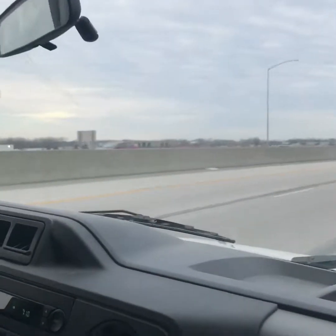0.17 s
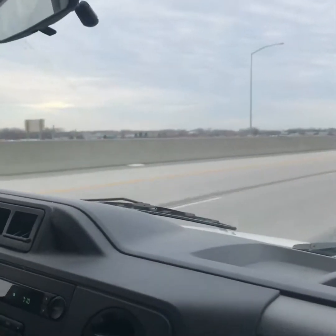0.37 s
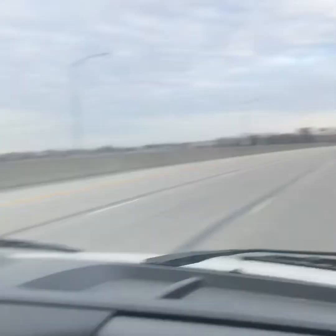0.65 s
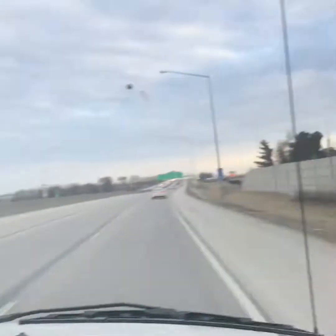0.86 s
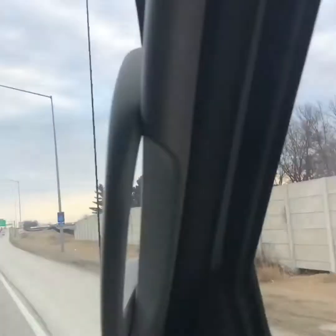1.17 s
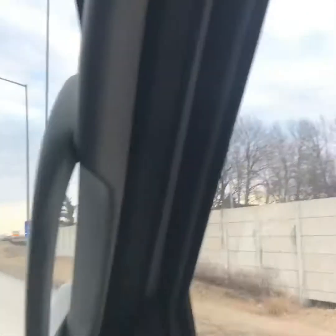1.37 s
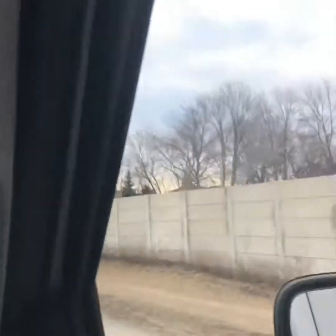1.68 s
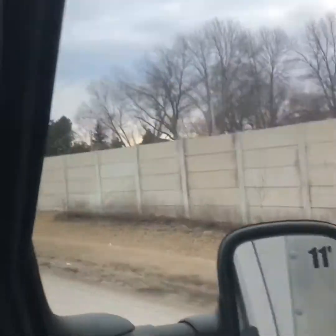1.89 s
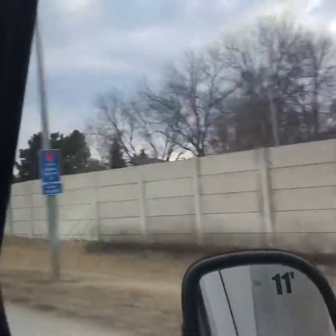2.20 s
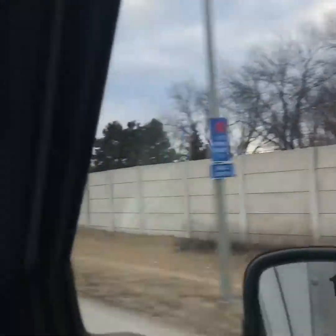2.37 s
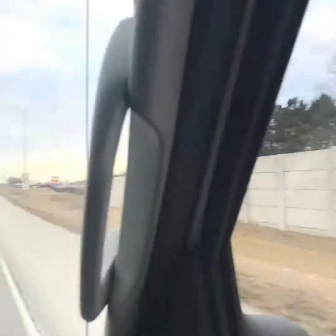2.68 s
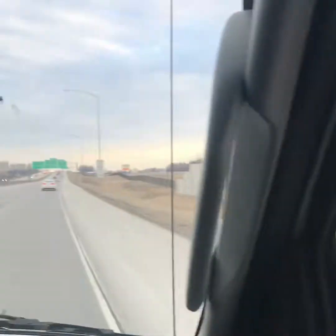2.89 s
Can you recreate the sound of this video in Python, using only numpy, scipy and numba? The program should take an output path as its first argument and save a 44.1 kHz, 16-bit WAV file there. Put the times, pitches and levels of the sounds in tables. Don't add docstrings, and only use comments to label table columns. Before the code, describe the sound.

Inside a moving van, a continuous bass-heavy boom fills the cab; the floor thuds unevenly over seams, panels resonate briefly, and faint wind whistles through a door seal, captured close by a turning phone.

```python
import sys
import numpy as np
from scipy import signal
from scipy.fft import rfft, irfft, next_fast_len
from scipy.io import wavfile
from scipy.ndimage import uniform_filter1d
from numba import njit

SR = 44100
rng = np.random.default_rng(int(sys.argv[2]) if len(sys.argv) > 2 else 0)


def to_wav(sig):
    pcm = np.clip(np.atleast_2d(sig), -1, 1) * 32767
    pcm = np.round(pcm).astype(np.int16)
    wavfile.write(sys.argv[1], SR, pcm.T)


def voltage_ratio(decibels):
    exponent = np.asarray(decibels, float) / 20
    return 10 ** exponent


N = 134505

# time_s, cycle_hz
ENGINE_CYCLE = [(0, 20.64), (.45, 20.65), (.7, 20.55), (1.3, 20.58), (1.9, 20.62), (3.05, 20.62)]
# order (multiple of the cycle), level_db (rms)
ENGINE_ORDERS = [(10, -44), (12, -54), (15, -53), (16, -56), (17, -59), (18, -54.5), (19, -58), (20, -60),
                 (25, -62), (28, -56.5), (29, -63), (30, -57.5), (31, -65), (33, -62.5)]
# pitch_hz, level_db (rms)
DRIVELINE_TONES = [
    (61.2, -27.5),
    (122.3, -38),
    (26.6, -38),
    (40.3, -38),
    (93.4, -41),
]
# time_s, load_db
DRIVELINE_LOAD = [(0, -1), (.3, 0), (.55, 1), (.8, 2.5), (1.2, 1), (1.35, -1), (1.55, 0), (1.85, 2),
                  (2.05, -2.5), (2.3, 1), (2.65, -1), (2.8, -0.5), (2.93, 0.5), (2.99, -16.5), (3.05, 8)]
# time_s, level_db (rms)
GEAR_WHINE = [(0, -48), (.3, -46), (.5, -51), (.9, -58), (3.05, -60)]
# frequency_hz, density_db (per Hz)
ROAD_SPECTRUM = [(8, -30), (18, -20), (30, -1), (60, -8), (135, -7), (230, -21.5), (460, -31), (900, -36)]
# time_s, level_db
ROAD_ROUGHNESS = [(0.03, -22.5), (0.1, -22.5), (1.15, -23.5), (1.24, -21.5), (1.29, -25.5), (1.54, -23),
                  (1.74, -24.5), (1.75, -20.5), (2.25, -22), (2.27, -21.5), (2.72, -22.5), (2.95, -23.5),
                  (2.99, -29), (3.02, -20.5)]
# time_s, peak_db, thump_hz
ROAD_SEAMS = [(0.118, -13, 44), (0.182, -14, 69), (0.281, -13.5, 45.3), (0.41, -14, 43.5), (0.672, -10, 58),
              (0.687, -19.5, 61.4), (0.756, -22, 37.4), (0.802, -12.5, 54), (0.963, -11, 32),
              (0.996, -11, 55.4), (1.099, -14.5, 45.4), (1.179, -10.5, 48.3), (1.211, -15, 37),
              (1.229, -11, 47), (1.328, -10, 49), (1.378, -15, 67), (1.457, -13, 60), (1.477, -15, 34.8),
              (1.522, -7.5, 61), (1.555, -7, 52), (1.604, -9.5, 50.3), (1.703, -12.5, 47),
              (1.849, -11, 38.3), (1.9, -10.5, 52.5), (1.997, -13, 65), (2.076, -11, 49.3),
              (2.127, -13, 65.6), (2.195, -11, 59.4), (2.26, -17, 74.5), (2.323, -13.5, 41),
              (2.422, -9, 71), (2.62, -15.5, 39), (2.928, -13, 60)]
# centre_s, length_s, pitch_hz, peak_db
PANEL_BOOMS = [(.15, 0.17, 93, -30), (.3, .3, 29, -22.5), (.62, 0.16, 100, -28), (.7, 0.38, 135, -32),
               (.76, 0.18, 43, -24), (1.0, 0.3, 36, -25), (1.05, 0.12, 120, -26.5), (1.23, 0.11, 42, -23.5),
               (1.55, 0.13, 95, -26), (1.72, .35, 42, -26), (2.2, 0.25, 93, -31.5), (2.3, 0.19, 38, -21.5),
               (2.42, 0.28, 142, -31.5), (2.42, .2, 190, -37), (2.63, 0.16, 46, -28),
               (2.8, 0.12, 98, -26.5)]
# frequency_hz, density_db (per Hz)
WIND_SPECTRUM = [(400, -23.5), (700, -12), (1300, -2), (1800, -11), (2300, -4), (3300, -27), (4600, -36.5),
                 (5000, -53.5)]
# time_s, wind_db, low_ring_hz, main_ring_hz, main_ring_db
CABIN_RINGS = [(0.03, -36, 882, 1375, 0), (0.35, -37.5, 907, 1450, 3), (0.46, -36.5, 1022, 1430, 0.5),
               (0.58, -36.5, 883, 1455, -2.5), (1.28, -37, 957, 1520, 0), (1.84, -37.5, 955, 1420, 0.5),
               (1.89, -39, 915, 1434, 4), (2.3, -38, 995, 1420, 2), (3.02, -38, 898, 1505, 1)]
# centre_s, length_s, pitch_hz, peak_db
SEAL_WHISTLES = [(.22, 0.089, 913, -47.5), (.55, .14, 1440, -46), (.65, .08, 1455, -42.5),
                 (.76, 0.062, 915, -52), (.83, .1, 1480, -50), (1.0, 0.077, 1497, -44),
                 (1.04, 0.12, 1460, -44), (1.09, 0.079, 950, -46.5), (1.15, 0.13, 998, -47.5),
                 (1.15, 0.14, 1500, -48), (1.2, .12, 1577, -43.5), (1.3, 0.13, 1500, -48),
                 (1.43, 0.064, 963, -44), (1.46, 0.087, 1465, -43), (1.52, .08, 986, -48),
                 (1.8, .1, 1493, -51.5), (1.86, 0.066, 1412, -45), (1.9, 0.064, 1440, -45),
                 (2.01, 0.077, 1423, -43), (2.1, 0.073, 1435, -50.5), (2.2, 0.091, 1416, -49.5),
                 (2.35, 0.15, 1400, -45.5), (2.5, .1, 993, -50.5), (2.75, 0.11, 1467, -45.5),
                 (2.95, 0.16, 1504, -49)]
# time_s, shaded_share (0-1)
BODY_SHADE = [(0, 0), (1.4, 0), (2.1, 0), (2.4, 0.22), (3.05, 0.09)]
# time_s, peak_db, ring_hz
TRIM_TICKS = [(.298, -57, 4200), (.338, -55, 4000), (.609, -54, 4000), (.614, -48, 3600), (.619, -53, 3800),
              (.624, -52, 4400), (.625, -57, 6500), (.634, -56, 4500), (.747, -55, 4600), (.768, -59, 5500),
              (.776, -59, 5500), (.847, -55, 4200), (1.47, -59, 6000), (1.498, -57, 4500),
              (1.512, -52, 3800), (1.521, -51, 4800), (1.53, -55, 4000), (1.568, -56, 3700),
              (1.737, -56, 3900), (1.818, -54, 3800), (1.83, -55, 3700), (2.037, -56, 3900),
              (2.118, -56, 4000), (2.207, -58, 4000)]
# frequency_hz, density_db (per Hz)
HISS_SPECTRUM = [(3500, -6), (5400, 3.5), (7600, -3), (8700, -0.5), (10400, -5.5), (11200, -3),
                 (12600, -1.5), (16000, 3.5)]


def level(x, db):
    return x * voltage_ratio(db) / np.sqrt(np.mean(x ** 2))


def column(table, axis):
    rows = np.array(table, float)
    return np.interp(np.arange(N) / SR, rows[:, 0], rows[:, axis])


def walk(rate_hz):
    hold = max(int(SR / rate_hz), 1)
    steps = np.repeat(rng.standard_normal(400), hold)[:N + 2 * hold]
    smooth = uniform_filter1d(uniform_filter1d(steps, hold), hold)
    return 1.27 * smooth[hold:N + hold]


@njit
def svf(x, hz, width_hz):
    y, band, low = np.empty(len(x)), 0., 0.
    for i in range(len(x)):
        g = np.tan(np.pi * hz[i] / SR)
        damping = width_hz / hz[i]
        v = (band + g * (x[i] - low)) / (1 + g * (g + damping))
        band, low = 2 * v - band, low + 2 * g * v
        y[i] = damping * v
    return y


def ring(x, hz, width_hz):
    centre_hz = hz + np.zeros(N)
    once = svf(x, centre_hz, 1. * width_hz)
    return svf(once, centre_hz, 1. * width_hz)


def coloured(spectrum, swell_db, flicker_db, flicker_hz):
    rows, size = np.array(spectrum, float), next_fast_len(N)
    octave = np.log2(np.arange(1, size // 2 + 2) * SR / size)
    points = np.log2(rows[:, 0])
    gain_db = np.interp(octave, points, rows[:, 1], left=-99, right=-99)
    noise = rfft(rng.standard_normal(size)) * voltage_ratio(gain_db)
    swell, out = swell_db * walk(4.284), 0
    for centre in np.arange(3, 15, .5):
        if points[0] - 1 < centre < points[-1] + 1:
            share = np.cos(np.pi * np.clip(octave - centre, -.5, .5)) ** 2
            band = irfft(noise * share, size)[:N]
            out = out + band * voltage_ratio(swell + flicker_db * walk(flicker_hz))
    return level(out, 0)


def tone(hz, db, wander_db, wander_hz):
    gain = np.sqrt(2) * voltage_ratio(db + wander_db * walk(wander_hz))
    turns = np.cumsum(hz) / SR + rng.random()
    return gain * np.sin(2 * np.pi * turns)


def bursts(times_s, db, decay_s):
    hits = np.zeros(N)
    places = np.clip((np.asarray(times_s) * SR).astype(int), 0, N - 1)
    np.add.at(hits, places, voltage_ratio(db))
    envelope = signal.lfilter([1], [1, -np.exp(-1 / (decay_s * SR))], hits)
    return envelope * rng.standard_normal(N)


def swelling_tones(table):
    t = np.arange(N) / SR
    clock = t + np.cumsum(.005 * walk(25.03)) / SR
    phase = rng.random((60, 1))
    out = np.zeros(N)
    for k, (centre_s, length_s, hz, db) in enumerate(table):
        envelope = voltage_ratio(db) * np.sqrt(2) * np.exp(-(2 * (t - centre_s) / length_s) ** 2)
        out += envelope * np.sin(2 * np.pi * (hz * clock + phase[k]))
    return out


def engine():
    cycle_hz = column(ENGINE_CYCLE, axis=1)
    return sum(tone(round(order) * cycle_hz, db, wander_db=3, wander_hz=3.5) for order, db in ENGINE_ORDERS)


def driveline():
    load_db = column(DRIVELINE_LOAD, axis=1)
    drones = sum(tone(hz + .4 * walk(3.01), db + load_db, wander_db=1.8, wander_hz=2.8)
                 for hz, db in DRIVELINE_TONES)
    whine_hz = 1401 + 2.5 * walk(1.41)
    return drones + tone(whine_hz, column(GEAR_WHINE, axis=1), wander_db=1.6, wander_hz=1.2)


def road():
    boom = coloured(ROAD_SPECTRUM, swell_db=.3, flicker_db=.7, flicker_hz=10)
    return voltage_ratio(column(ROAD_ROUGHNESS, axis=1) - 2) * boom


def seams():
    t, out = np.arange(N) / SR, np.zeros(N)
    for peak_s, db, hz in ROAD_SEAMS:
        swing = (np.pi * 1.17 * hz * (t - peak_s)) ** 2
        out += voltage_ratio(db - 2) * (1 - 2 * swing) * np.exp(-np.minimum(swing, 50))
    return out


def panel_booms():
    return swelling_tones(PANEL_BOOMS)


def rush():
    return rng.standard_normal(N) * voltage_ratio(1.1 * walk(11))


def wind():
    low_hz, main_hz = column(CABIN_RINGS, axis=2), column(CABIN_RINGS, axis=3)
    main_db = column(CABIN_RINGS, axis=4)
    low = level(ring(rush(), low_hz, width_hz=276), -7.5)
    main = level(ring(rush(), main_hz, width_hz=310), -7.5) * voltage_ratio(main_db + 0.71 * walk(20))
    leak = ring(rush(), main_hz + 20 * walk(4.2), width_hz=60)
    main += level(leak, -18) * voltage_ratio(main_db)
    high = level(ring(rush(), 2440, width_hz=574), -12)
    broad = voltage_ratio(-4) * coloured(WIND_SPECTRUM, swell_db=.4, flicker_db=1.2, flicker_hz=12)
    return voltage_ratio(column(CABIN_RINGS, axis=1)) * (broad + low + main + high)


def seal_whistles():
    return swelling_tones(SEAL_WHISTLES)


def body_shade(cab):
    hum = svf(cab, 616 + np.zeros(N), 890.)
    return cab - np.clip(column(BODY_SHADE, axis=1), 0, 1) * hum


def trim():
    decay_s, width_hz, crackle_per_s = .004, 2400, 70
    rows = np.array(TRIM_TICKS)
    chance = rng.random((400, 2))
    crackle_s = np.cumsum(-np.log(chance[:, 0]) / crackle_per_s)
    crackle_db = np.where(crackle_s < N / SR, -66 + 4 * (2 * chance[:, 1] - 1), -200)
    latest = np.clip(np.searchsorted(rows[:, 0], np.arange(N) / SR) - 1, 0, None)
    ticks = ring(bursts(rows[:, 0], rows[:, 1] + 5.5, decay_s), rows[latest, 2], width_hz)
    return ticks + ring(bursts(crackle_s, crackle_db, decay_s), 4500, 2.0 * width_hz)


def phone():
    step_hz, first_s, second_s, decay_s = 60.01, .015, .0097, .0013
    times_s = first_s + np.arange(int(N / SR * step_hz) - 1) / step_hz
    scatter_db = 1.8 * rng.standard_normal((len(times_s), 2))
    ticks = bursts(times_s, scatter_db[:, 0], decay_s)
    ticks = ticks + bursts(times_s + second_s, -4 + scatter_db[:, 1], decay_s)
    motor = level(ring(ticks, 13200, width_hz=6000), -81)
    hiss = voltage_ratio(-72) * coloured(HISS_SPECTRUM, swell_db=.6, flicker_db=.8, flicker_hz=12)
    fade_db = -1 * (np.arange(N) - N / 2) / SR
    return voltage_ratio(fade_db) * (hiss + motor)


def scene():
    cab = engine() + driveline() + road() + seams() + panel_booms() + wind() + seal_whistles()
    return (body_shade(cab) + trim() + phone())[None]


def top_cut(x):
    return signal.sosfilt(signal.butter(12, 15730, fs=SR, output="sos"), x)


def record(dry):
    return top_cut(dry)


dry = scene()
out = record(dry)
to_wav(out)
```